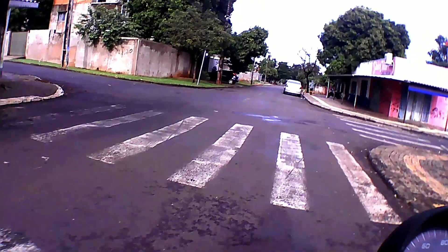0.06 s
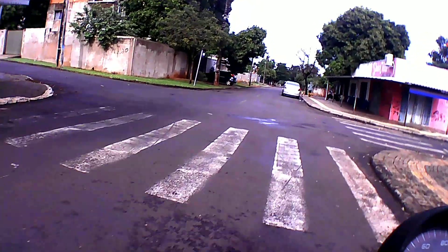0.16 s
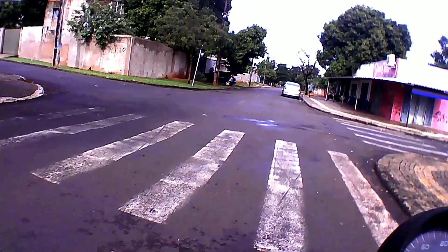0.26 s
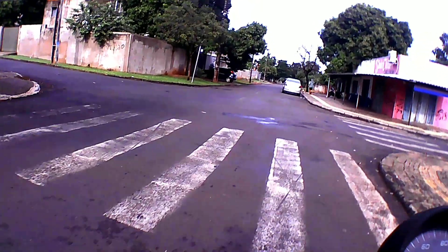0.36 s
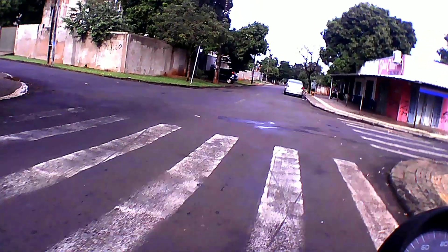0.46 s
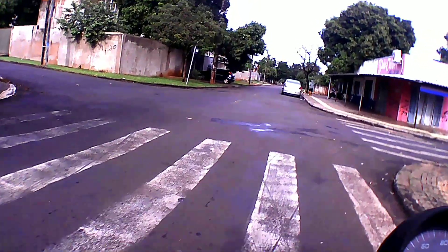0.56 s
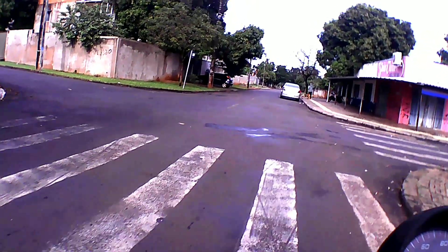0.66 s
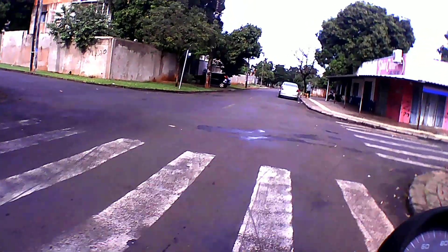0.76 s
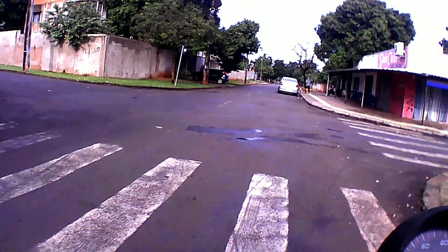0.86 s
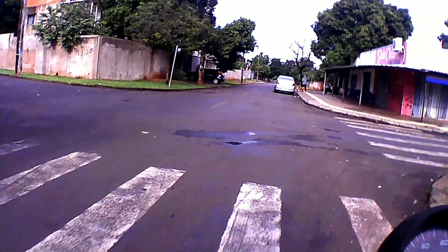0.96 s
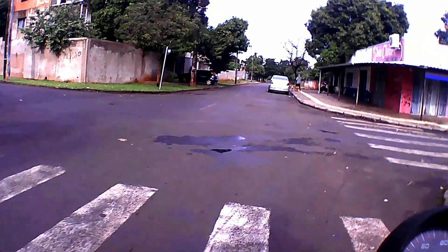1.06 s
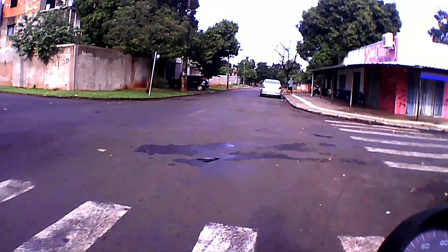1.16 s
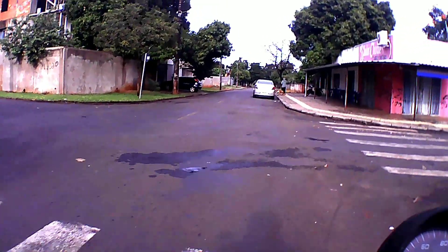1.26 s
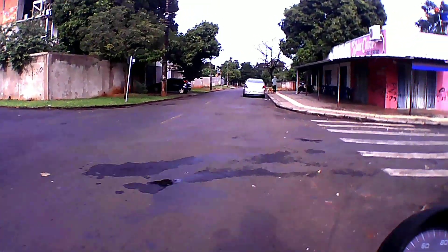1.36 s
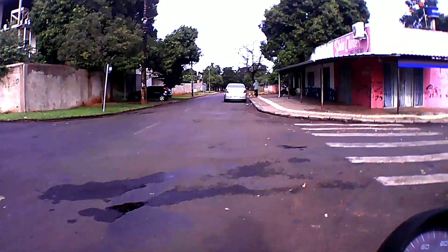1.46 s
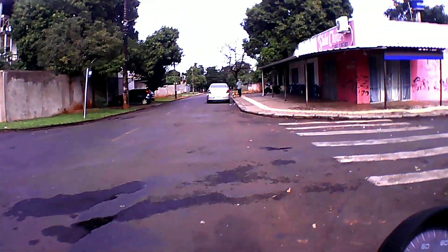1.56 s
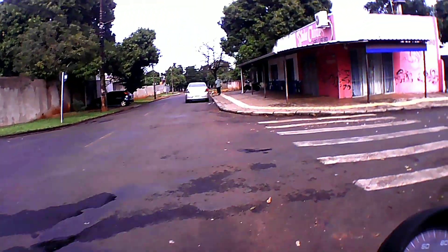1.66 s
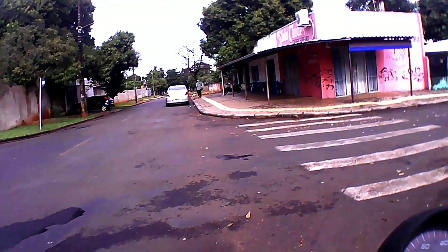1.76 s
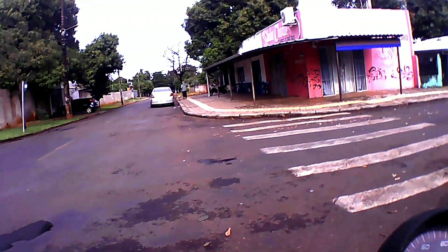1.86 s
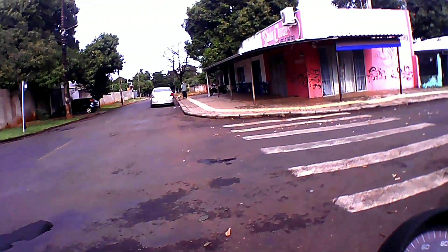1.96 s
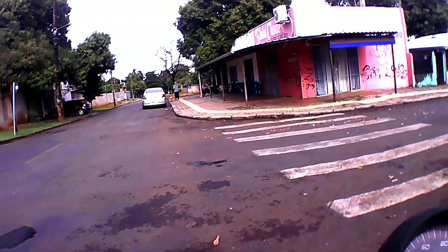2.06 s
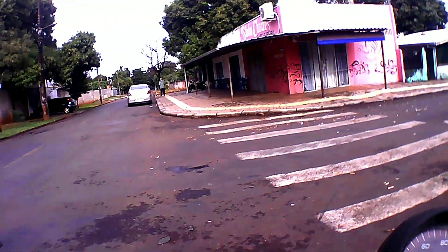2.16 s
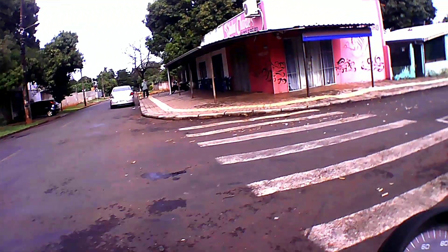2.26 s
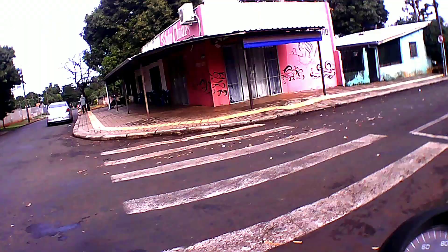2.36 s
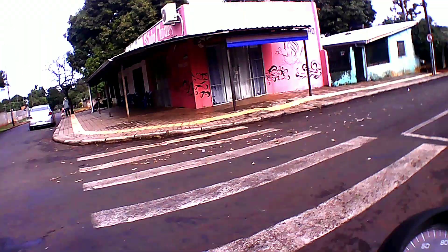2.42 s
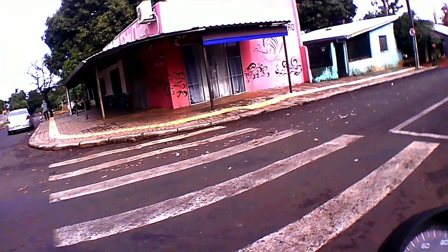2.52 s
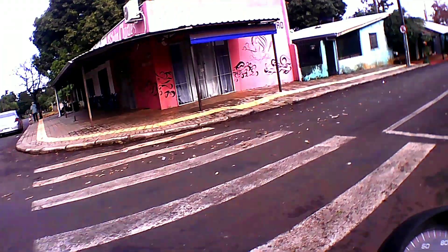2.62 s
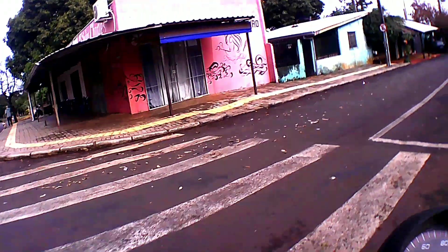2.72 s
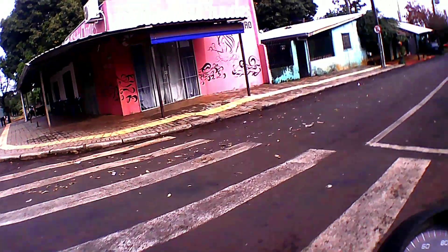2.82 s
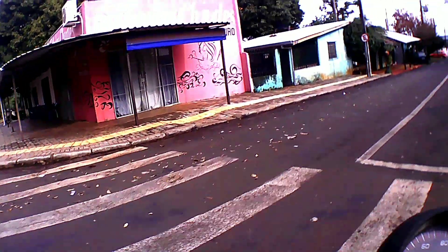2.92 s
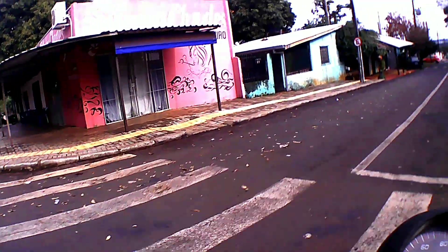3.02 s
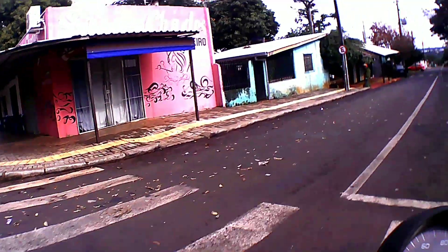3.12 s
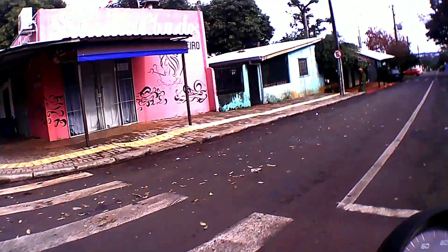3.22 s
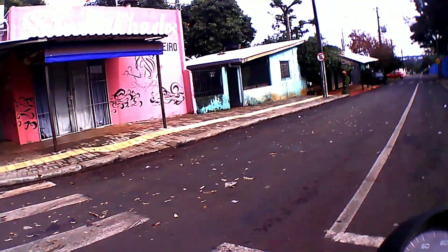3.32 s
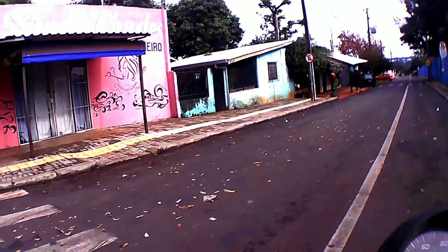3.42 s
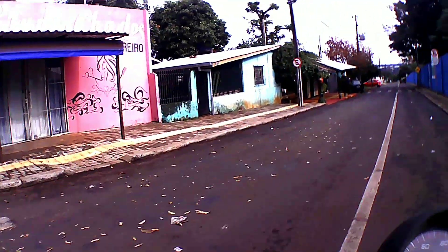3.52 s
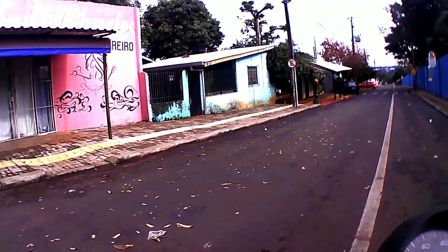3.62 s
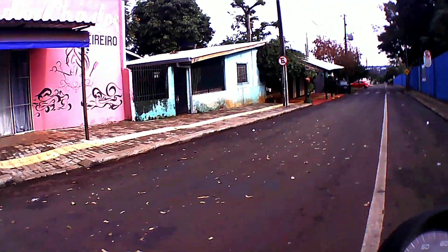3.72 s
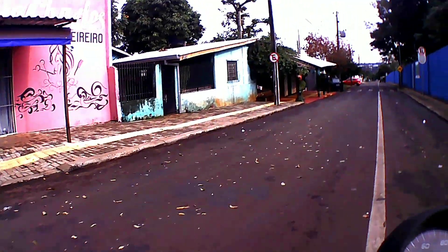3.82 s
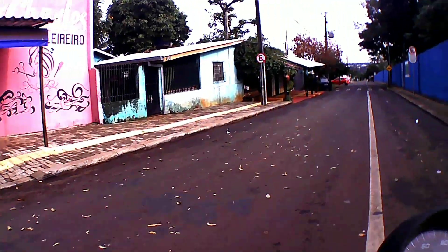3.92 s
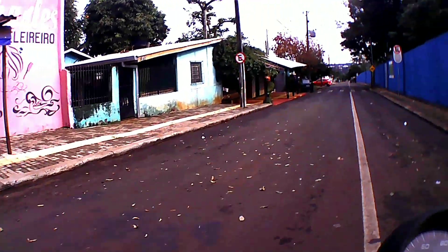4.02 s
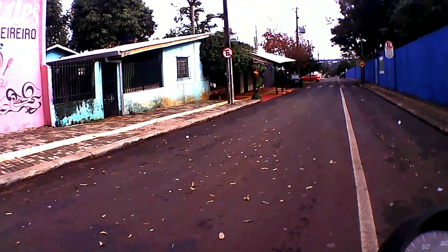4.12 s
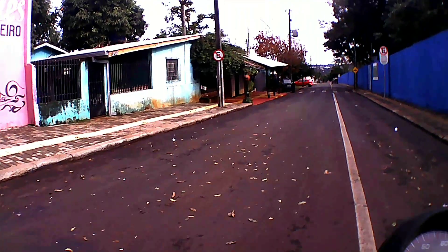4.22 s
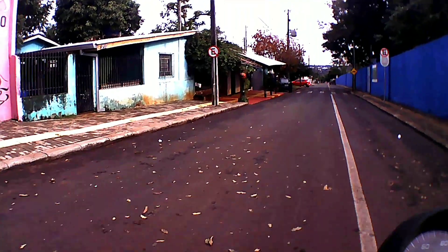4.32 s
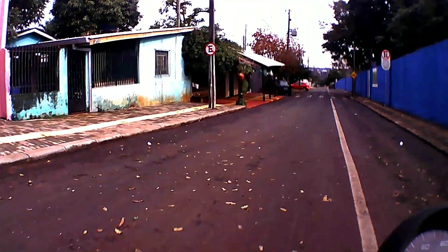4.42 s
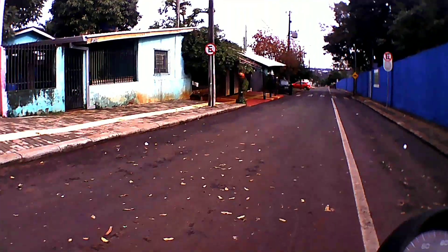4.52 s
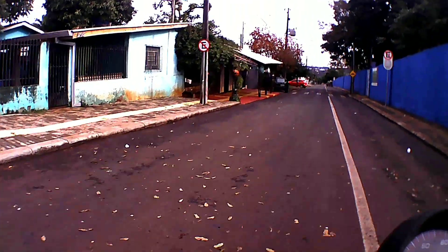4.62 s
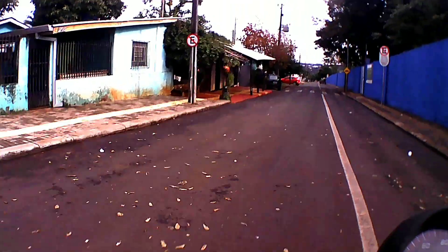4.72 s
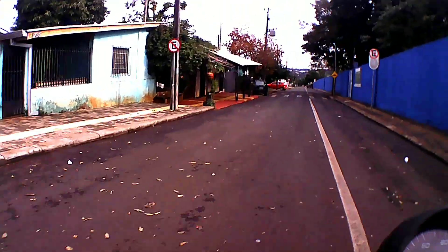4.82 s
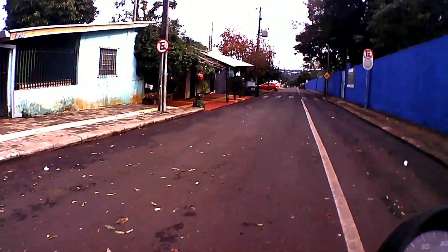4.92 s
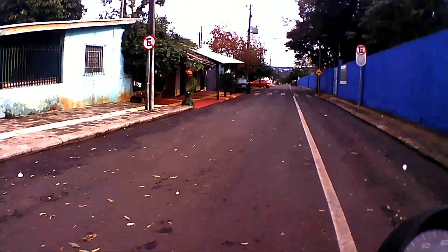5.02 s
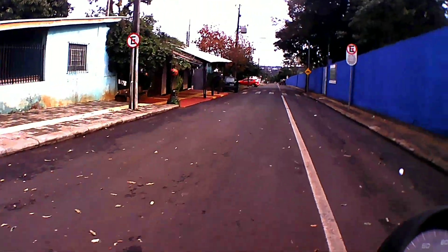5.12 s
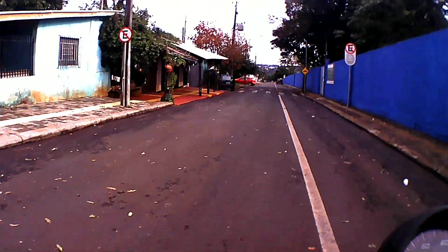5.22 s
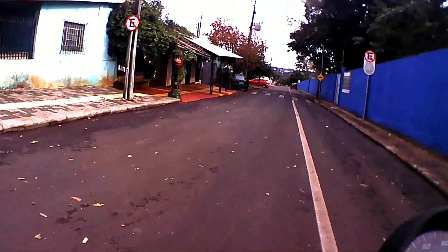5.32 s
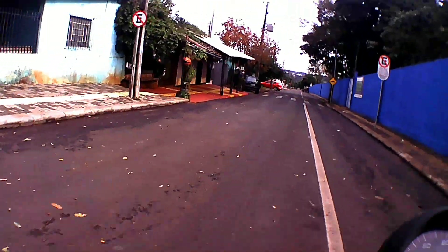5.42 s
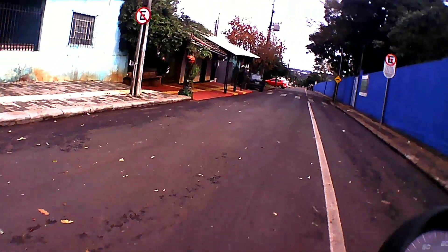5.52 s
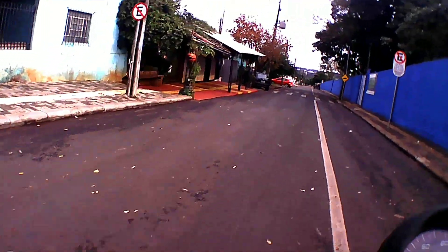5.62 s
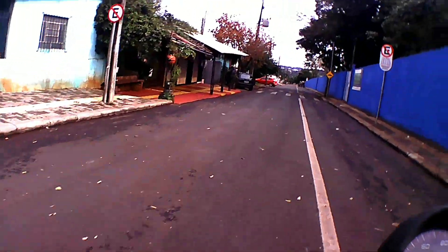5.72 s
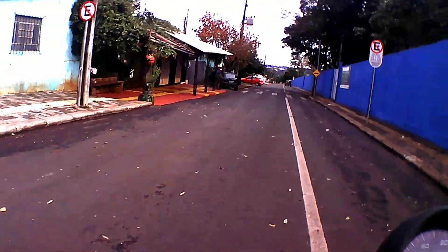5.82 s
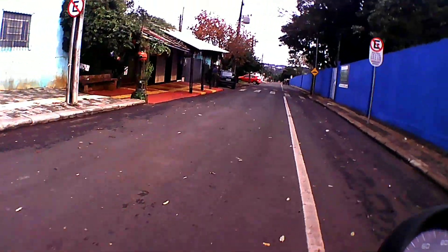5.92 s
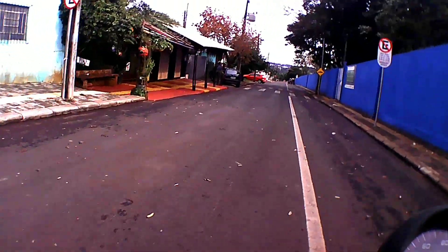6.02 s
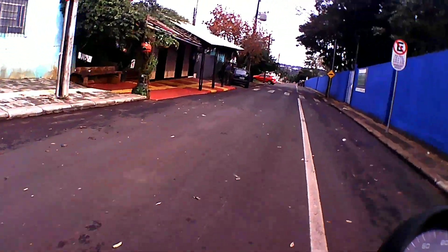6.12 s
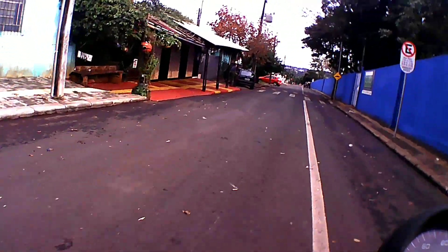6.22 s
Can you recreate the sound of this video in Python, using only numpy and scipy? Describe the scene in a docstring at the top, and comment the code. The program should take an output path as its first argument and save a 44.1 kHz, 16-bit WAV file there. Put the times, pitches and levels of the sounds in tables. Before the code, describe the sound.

A single-cylinder motorcycle slows, then pulls away, with close plastic knocks and buzzing rattles over low wind rumble.

```python
"""On an asphalt road, aboard a single-cylinder motorcycle that slows, turns and pulls away.
The microphone rides in a small camera's loose plastic housing: engine shake and road bumps make
the walls, a panel and small hard parts knock, tick and buzz at very close range. Wind and tyres
rumble below, and the low engine orders come through as the throttle opens.
The hardest knocks overload the microphone."""
import sys
import numpy as np
from scipy import signal
from scipy.fft import rfft
from scipy.io import wavfile

SR = 44100
rng = np.random.default_rng(int(sys.argv[2]) if len(sys.argv) > 2 else 0)


def unload_wav(signal):
    """Save mono or channel-first audio to the path in sys.argv[1] as 16-bit WAV at rate SR, clipped to [-1, 1]."""
    wavfile.write(
        sys.argv[1],
        SR,
        np.round(np.clip(np.atleast_2d(signal).T, -1, 1) * 32767).astype(np.int16),
    )


N = 276507
TIME = np.arange(N) / SR

# Resonances of the housing around the microphone: (frequency [Hz], width [Hz], relative level [dB])
WALL_MODES = [(182.4, 280, -7), (424, 500, -6), (603, 173, 5.5), (782, 350, 0.5), (1031, 346, 2),
              (1267, 334, -7), (1685, 266, -18.5), (2530, 260, -25), (3840, 710, -34.5)]
PANEL_MODES = [(448, 250, -13), (1338, 200, 1), (1750, 680, -11.5), (1878, 210, -2)]
SMALL_PART_MODES = [(2170, 1810, 11.5), (2600, 310, -5), (3900, 330, 4), (4160, 1400, 2), (4900, 590, -20),
                    (6360, 1100, -8.5)]
# Distinct blows, right at the microphone: (time [s], wall thud peak [dB], small-part tick peak [dB])
BLOWS = [(.075, -17.5, -40), (.108, -18, -56), (.1812, -18.5, -32), (.2478, -24, -41), (.3551, -18.5, -31),
         (.37, -20, -21), (.379, -16, -28), (.3935, -18, -28.5), (.4132, -24.5, -29), (.4703, -19.5, -36),
         (.4905, -21.5, -32), (.5413, -31, -35.5), (.7079, -36, -33), (.7492, -16.5, -43),
         (.7746, -13, -25), (.8409, -7.5, -8.5), (.85, -7.5, -15), (.8572, -10.5, -34), (.9094, -33, -29),
         (.9814, -17.5, -26.5), (.9972, -19.5, -26), (1.0393, -32, -43), (1.0693, -17.5, -42),
         (1.153, -21, -42), (1.1803, -25, -42), (1.2317, -24.5, -36), (1.2733, -21.5, -50),
         (1.4015, -16, -58), (1.4733, -28, -34.5), (1.6674, -30, -37), (1.7933, -29, -49),
         (1.9013, -29, -29.5), (1.9207, -29, -32.5), (1.941, -24.5, -36), (1.991, -31, -41),
         (2.041, -27, -42), (2.2973, -25, -41), (2.3285, -30, -40), (2.4513, -30, -36), (2.7416, -26, -63),
         (2.7907, -22.5, -25.5), (2.84, -25.5, -32), (2.8852, -20.5, -34), (2.982, -28.5, -41),
         (3.0498, -23.5, -32.5), (3.0773, -22, -32), (3.0834, -31, -32), (3.11, -23.5, -26),
         (3.1401, -19, -22), (3.188, -31, -36), (3.2645, -41, -30), (3.2865, -34, -29), (3.3035, -30, -28),
         (3.3801, -23.5, -27), (3.4001, -24, -27), (3.4342, -25, -36), (3.7458, -26.5, -41),
         (3.7856, -29, -42), (4.026, -33, -41), (4.087, -15, -29), (4.0927, -7.5, -37),
         (4.0971, -17, -15.5), (4.1047, -21, -22), (4.1147, -17, -21), (4.1968, -32, -42),
         (4.235, -20.5, -41), (4.3005, -7, -14.5), (4.3185, -21.5, -26.5), (4.387, -43, -50),
         (4.4163, -28, -39), (4.4405, -12, -25), (4.4469, -6, -31), (4.4546, -0.5, -1), (4.471, -15, -6),
         (4.476, -5, -14), (4.4981, -14, -10), (4.513, -17.5, -18), (4.5316, -25, -22.5), (4.565, -20, -30),
         (4.5912, -19.5, -31), (4.6136, -35, -33), (4.6301, -19.5, -25), (4.694, -8, -43), (4.7, 1.5, -12),
         (4.7048, 0.5, 0), (4.7107, -2.5, -8), (4.7175, -0.5, -2), (4.7333, -10, -4), (4.7395, 1.5, 0.5),
         (4.745, -4, -10.5), (4.7675, -12.5, -15.5), (4.8123, -35, -17.5), (4.8302, -6.5, -10),
         (4.887, -16.5, -19), (4.9583, -15, -20.5), (4.9785, -11, -20), (4.9894, -11, -17.5),
         (5.0106, -22, -27), (5.047, -32, -19), (5.0595, -2, -5), (5.0685, -11.5, -9.5),
         (5.0785, -14, -15.5), (5.1891, -11, -21.5), (5.2118, -11.5, -37), (5.2405, -13, -11),
         (5.2776, -8, -15), (5.29, -12, -23), (5.3005, -18, -13.5), (5.3134, -11.5, -14),
         (5.3823, -12, -11), (5.4057, -4, -6), (5.4167, -9.5, -13), (5.4228, -13, -11), (5.448, -23, -24),
         (5.4622, -9, -15), (5.4957, -8, -13.5), (5.5141, -16, -14), (5.5376, -13.5, -16),
         (5.5482, -17, -13), (5.5936, -15.5, -21), (5.6161, -11.5, -13), (5.6474, -12, -11.5),
         (5.6769, -5, -16.5), (5.7054, -2, -10), (5.7302, -3, -3.5), (5.7555, -5, -7), (5.7705, -11, -13),
         (5.7925, -12, -11), (5.805, -10, -17), (5.8302, -12, -10), (5.8552, -5.5, -21), (5.8809, -9, -20),
         (5.9848, -9, -12.5), (6.0335, -6, -19), (6.0638, -15.5, -19), (6.0918, -5.5, -17.5),
         (6.1076, -17.5, -16), (6.1463, -12, -13.5), (6.1735, -23, -21), (6.2351, -10, -14.5)]

def knocks(blows, clack_db):
    """Each blow is a short rough chatter that pushes the housing and rings walls, panel, small parts."""
    length = 2000
    ms = 1000 * np.arange(length) / SR
    chatter = rng.standard_normal((len(blows), length))
    dull = chatter * (1 - np.exp(-ms / 0.9)) * np.exp(-ms / 2.9)
    sharp = chatter * np.exp(-ms / 1.57)  # treble starts and dies sooner

    def ring(bursts, response):
        rung = signal.fftconvolve(bursts, response[None], axes=1)[:, :length]
        return rung / abs(rung).max(axis=1, keepdims=True)

    thuds = ring(dull, impulse_response(modes=WALL_MODES))
    ticks = ring(sharp, impulse_response(modes=SMALL_PART_MODES))
    clacks = gain_of(clack_db) * ring(sharp, impulse_response(modes=PANEL_MODES))
    thumps = gain_of(-12) * ring(dull, impulse_response(RUMBLE_SPECTRUM))
    out = np.zeros(N + 2 * length)
    for (start, thud_db, tick_db), body, tick in zip(blows, thuds + clacks + thumps, ticks):
        at = round(start * SR)
        out[at:at + length] += gain_of(thud_db) * body + gain_of(tick_db) * tick
    return out[:N]


def light_taps(turns, buzz_db, chance=.65, jitter_s=.003):
    """A crank turn may set off one light tap of the housing, louder the more it buzzes."""
    at = np.flatnonzero(np.diff(np.floor(turns)))
    struck = rng.random(len(at)) < chance
    jitter, thud_spread_db, tick_spread_db = rng.standard_normal((len(at), 3)).T
    starts = abs(TIME[at] + jitter_s * jitter)
    thud_db = buzz_db[at] + 8 + thud_spread_db
    tick_db = -23.5 + 1.16 * (buzz_db[at] + 20) + tick_spread_db  # ticks grow faster than thuds
    return knocks(np.transpose([starts, thud_db, tick_db])[struck], clack_db=-14.5)


# The ride, heard from inside the housing: (time [s], wall buzz [dB], small-part fizz [dB], rumble [dB])
RIDE_LEVELS = [(0, -29.5, -67, -33.5), (.5, -34.5, -77, -33.5), (.85, -31, -51.5, -32.5),
               (1.2, -34.5, -80, -37), (1.6, -42.5, -64, -37), (2.1, -43, -68, -41.5),
               (2.65, -44.5, -69, -38.5), (3.1, -38.5, -61.5, -38.5), (3.45, -41, -70.5, -36.5),
               (3.7, -44, -73, -37.5), (4.2, -42.5, -69.5, -37.5), (4.47, -32.5, -52.5, -32.5),
               (4.64, -39.5, -57, -37), (4.78, -25, -47, -38.5), (5.04, -24, -44, -32.5),
               (5.16, -31.5, -54, -37.5), (5.27, -16.5, -34, -27), (5.35, -24.5, -42, -40),
               (5.42, -21.5, -34.5, -36), (5.68, -22, -36, -33), (5.8, -21, -30, -35),
               (5.98, -22.5, -39.5, -41), (6.27, -21.5, -41, -35)]
# The panel ringing next to the microphone: (time [s], level [dB])
PANEL_LEVELS = [(0, -39.5), (.25, -47), (.5, -48.5), (.85, -46), (1.2, -67), (1.5, -68), (2.7, -67),
                (4.05, -66), (4.5, -52), (4.65, -61), (4.85, -34.5), (5.15, -39), (5.4, -28), (5.75, -24.5),
                (5.88, -20), (6.27, -25.5)]

def housing_buzz(turns, buzz_db, fizz_db, panel_db):
    """The housing chatters in its mount, harder once a turn, hardest at each firing (every second turn)."""
    beat = 0.65 + 0.31 * np.exp(-(turns % 1) / 0.11) + 0.12 * np.exp(-(turns % 2) / 0.12)
    rub, fizz, shiver = (
        unit_rms(beat * gain_of(2.62 * wander(per_s=40)) * rng.standard_normal(N)) for _ in range(3))
    sizes = gain_of(2.6 * np.minimum(rng.exponential(1, N), 4))
    ticks_per_s = 450 * beat ** 2
    hits = sizes * (rng.random(N) < ticks_per_s / SR)
    tick_envelope = through(hits, np.exp(-np.arange(200) / 20))
    ticks = unit_rms(tick_envelope * rng.standard_normal(N))
    walls = through(gain_of(buzz_db) * (rub + 0.18 * ticks), impulse_response(modes=WALL_MODES))
    rattle = gain_of(fizz_db) * (0.93 * fizz + 1.31 * ticks)
    small_parts = through(rattle, impulse_response(modes=SMALL_PART_MODES))
    panel = through(gain_of(panel_db) * shiver, impulse_response(modes=PANEL_MODES))
    return walls + small_parts + panel


# The engine, close by on the same frame: (time [s], crank speed [turns/s], hum level [dB])
CRANK = [(0, 66, -51), (.84, 43, -56), (1.4, 40.6, -56), (4, 48.4, -54), (5.1, 46.7, -69), (5.2, 41.8, -46),
         (5.298, 47.9, -35), (5.392, 57.4, -45), (5.598, 60.5, -37), (5.666, 71.9, -37.5),
         (5.72, 80.1, -28.5), (5.884, 78.8, -36.5), (5.96, 76.5, -39), (6.04, 73, -35), (6.13, 70, -39.5),
         (6.27, 68, -40)]
# Its tones: (multiple of crank speed [ratio], level against the hum [dB])
ENGINE_ORDERS = [(1, -6.5), (2, 1.5), (2.5, -10), (3, 2), (3.5, -13), (4, -3.5), (5, -2), (6, -5)]
# The path through the frame to the microphone: (frequency [Hz], gain [dB])
FRAME_RESPONSE = [(40, 3.5), (80, 1.5), (125, -6.5), (160, 1.5), (190, -2), (222, 5.5), (242, -9),
                  (300, -1.5), (500, 6)]

def engine(speed, turns, hum_db):
    """The crank's orders sound as wavering tones, coloured by the frame."""
    frame_hz, frame_db = np.transpose(FRAME_RESPONSE)
    hum = np.zeros(N)
    for order, order_db in ENGINE_ORDERS:
        path_db = np.interp(np.log(order * speed), np.log(frame_hz), frame_db)
        level = gain_of(hum_db + order_db + path_db + wander(per_s=11))
        hum += np.sqrt(2) * level * np.sin(2 * np.pi * (order * turns + rng.random()))
    return hum


# Wind around the microphone and tyres below it: (frequency [Hz], relative spectral density [dB])
RUMBLE_SPECTRUM = [(12, -49.5), (20, -25.5), (174, 1.5), (232, 1), (333, -7.5), (450, -8.5), (580, -11.5),
                   (990, -120)]

def rumble(level_db, gust_db=1.5):
    """Wind on the housing and tyres on asphalt make a lumpy low noise."""
    level = gain_of(level_db + gust_db * wander(per_s=14))
    return level * through(rng.standard_normal(N), impulse_response(RUMBLE_SPECTRUM))


def gain_of(db):
    """Decibels to amplitude."""
    return 10 ** (np.asarray(db) / 20)


def unit_rms(x):
    """Scales to rms 1."""
    return x / np.sqrt(np.mean(x ** 2) + 1e-20)


def curves(rows):
    """One value a sample for each column after the time."""
    times, *columns = np.transpose(rows)
    return [np.interp(TIME, times, column) for column in columns]


def impulse_response(spectrum=None, modes=None):
    """Minimum-phase response of energy 1 from a spectrum or from steep-skirted resonances."""
    hz = abs(np.fft.fftfreq(8192, 1 / SR)) + 1
    if modes:
        power = sum(gain_of(db) ** 2 / (1 + ((hz - f ** 2 / hz) / width) ** 2) ** 2
                    for f, width, db in modes)
        log_gain = np.log(power) / 2
    else:
        f, db = np.transpose(spectrum)
        log_gain = np.log(gain_of(np.interp(np.log(hz), np.log(f), db)))
    response = np.fft.ifft(np.exp(np.conj(signal.hilbert(log_gain)))).real[:4096]
    return response / np.linalg.norm(response)


def through(x, response):
    """Filters x, keeping its length."""
    return signal.oaconvolve(x, response)[:len(x)]


def lowpass(x, hz):
    """Steep cut of the treble, without delay."""
    return signal.oaconvolve(x, signal.firwin(511, hz, window=("kaiser", 9), fs=SR)[None], "same")


def wander(per_s):
    """Random drift of rms 1."""
    count = int(N / SR * per_s) + 2
    return unit_rms(np.interp(TIME, np.arange(count) / per_s, rng.standard_normal(count)))


def scene():
    """Housing, engine, wind and tyres meet at the one on-board microphone."""
    speed, hum_db = curves(CRANK)
    buzz_db, fizz_db, rumble_db = curves(RIDE_LEVELS)
    panel_db, = curves(PANEL_LEVELS)
    turns = np.cumsum(speed) / SR + .3
    hum = engine(speed, turns, hum_db)
    buzz = housing_buzz(turns, buzz_db, fizz_db, panel_db)
    return (hum + buzz + rumble(rumble_db) + knocks(BLOWS, clack_db=-8) + light_taps(turns, buzz_db))[None]


# Colour of the on-board microphone: (frequency [Hz], relative gain [dB])
MIC_RESPONSE = [(20, -12.5), (60, -1), (150, -3.5), (6000, -2), (6600, -5.5), (7000, -11), (7600, -30)]

def record(dry, hiss_db=-69, soft_limit=.95, hard_limit=.71):
    """The microphone hisses, overloads softly and colours the sound; the loudest knocks then clip."""
    colour = impulse_response(MIC_RESPONSE)
    noisy = dry[0] + gain_of(hiss_db) * rng.standard_normal(N)
    squashed = soft_limit * np.tanh(noisy / soft_limit)
    coloured = through(squashed, colour / abs(rfft(colour)).max())[None]
    clipped = np.clip(lowpass(coloured, hz=7569), -hard_limit, hard_limit)  # spits a little treble
    return lowpass(clipped, hz=15500)


dry = scene()
out = record(dry)
unload_wav(out)
```